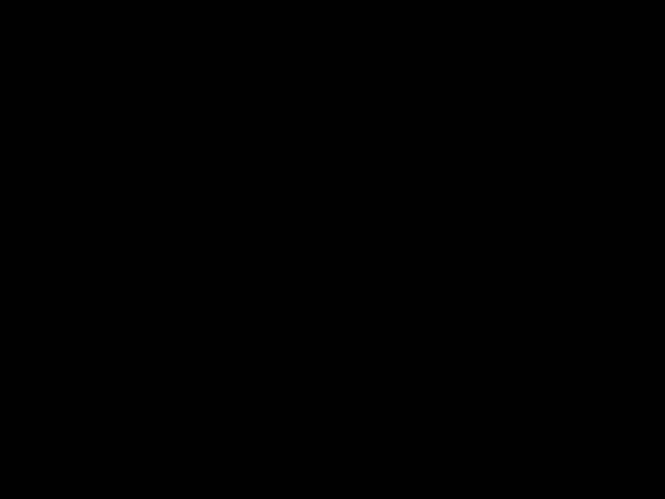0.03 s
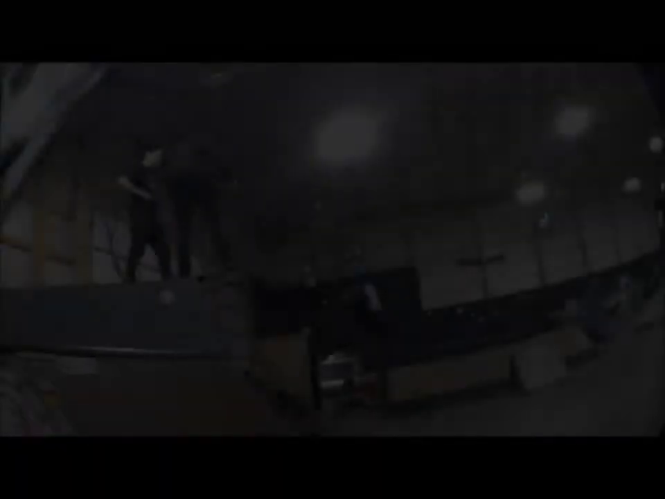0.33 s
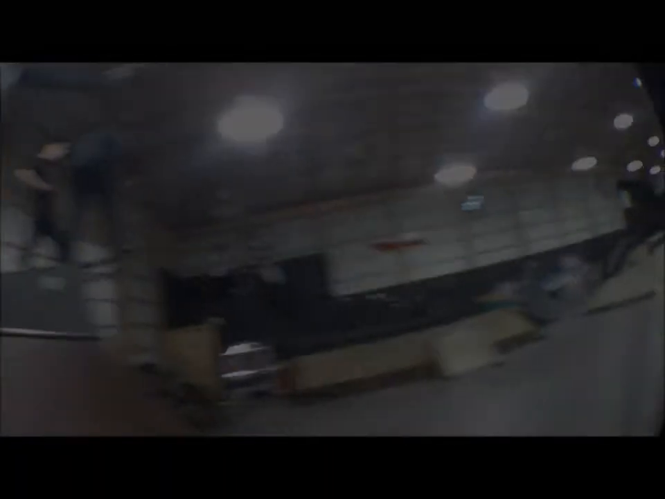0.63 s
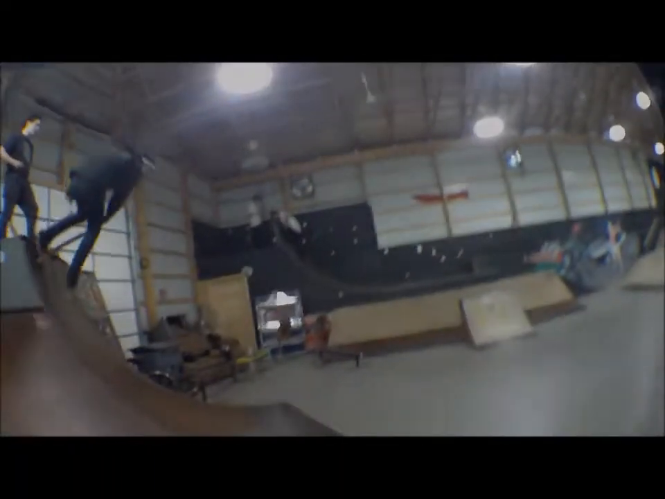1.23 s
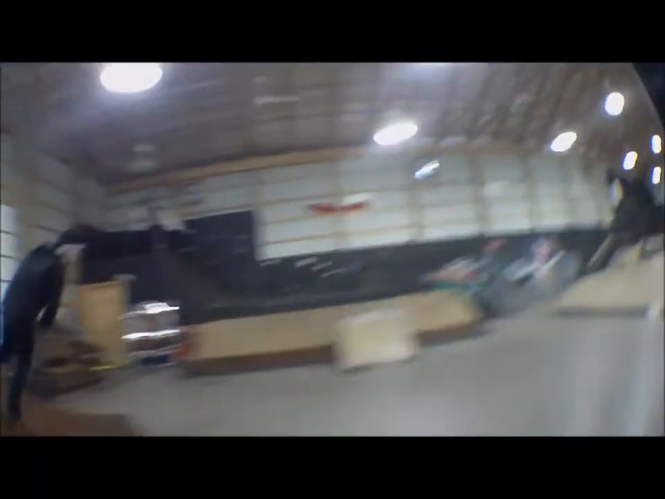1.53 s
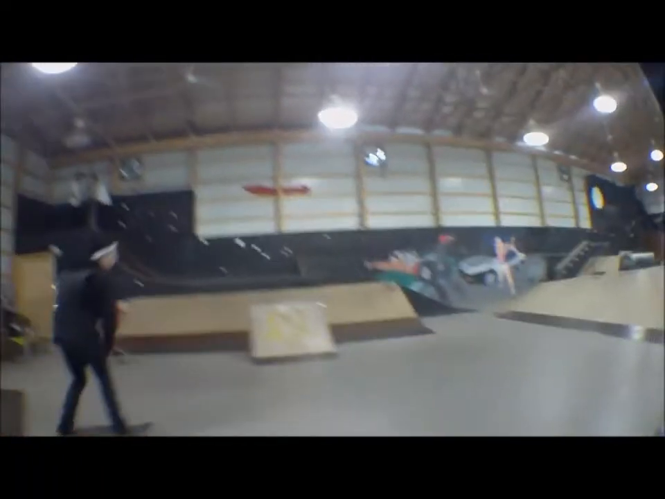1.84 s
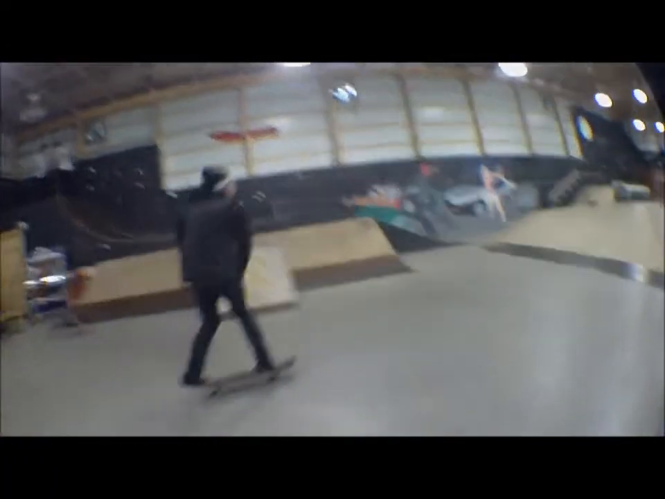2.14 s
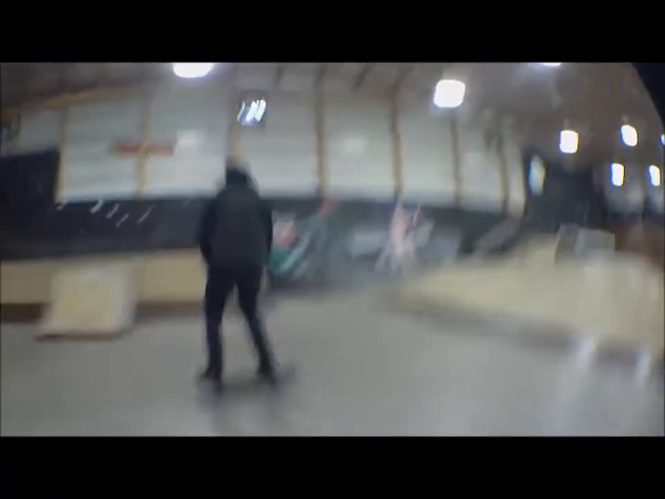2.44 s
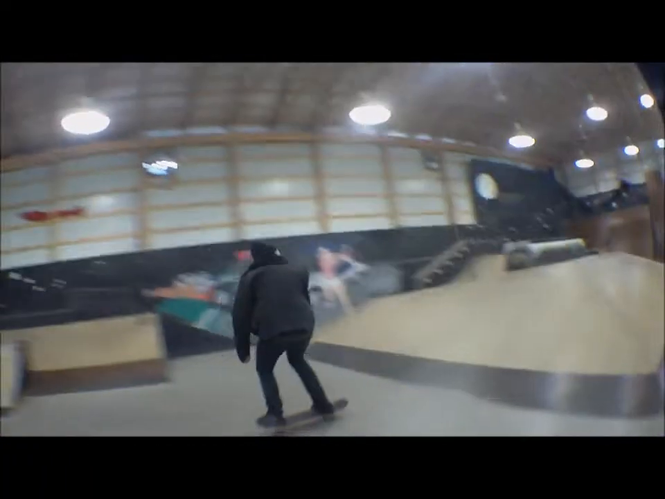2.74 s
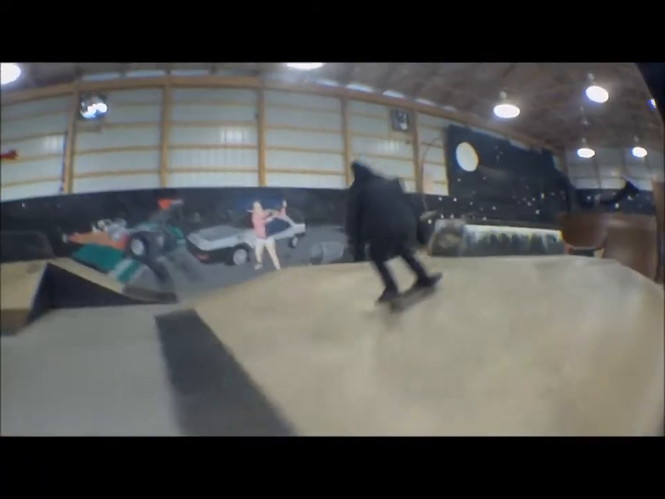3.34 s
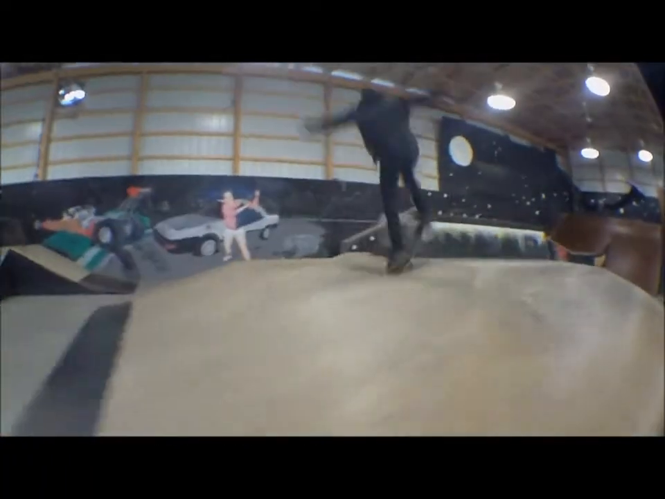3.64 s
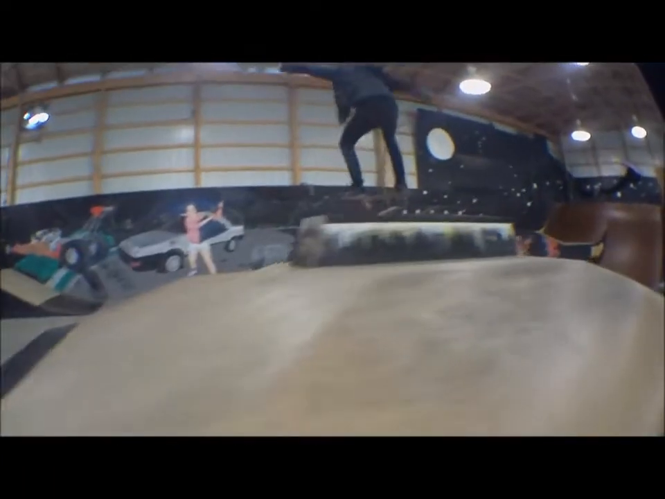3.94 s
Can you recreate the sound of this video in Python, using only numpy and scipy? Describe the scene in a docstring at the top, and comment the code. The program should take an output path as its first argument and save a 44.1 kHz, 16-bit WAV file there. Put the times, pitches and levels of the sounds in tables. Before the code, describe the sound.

A skateboard drops down a hollow wooden ramp, rolls across concrete with ringing wheels, then rumbles up a wooden bank with sharp clacks. The big hall echoes, and air buffets the microphone following close behind.

```python
"""Skateboarding in a big hall

A skateboarder drops in on a plywood quarter pipe, crosses a concrete floor and rides up a wooden bank.
The wheels rumble in the hollow ramps, sing on the concrete and clack over seams, and the hall echoes.
Other boards roll far away. A mono camera follows close by: it pops as it starts, air buffets its
microphone and its limiter turns down the loudest clacks."""
import sys
import numpy as np
from scipy import signal
from scipy.fft import rfft, irfft
from scipy.io import wavfile
from scipy.ndimage import uniform_filter1d, minimum_filter1d

SR = 44100
rng = np.random.default_rng(int(sys.argv[2]) if len(sys.argv) > 2 else 0)


def persist_wave(psi):
    """Save psi, clipped to +-1, as 16-bit WAV."""
    counts = np.round(np.clip(psi, -1, 1) * 32767).astype(np.int16)
    wavfile.write(sys.argv[1], SR, np.atleast_2d(counts).T)


N = 176400
T = np.arange(N) / SR
HZ = np.fft.rfftfreq(N, 1 / SR)
CAMERA_START_S = 0.1059

# The tone of each sound, from bass to treble. Each row: frequency in Hz, relative level in dB.
FAR_ROLL_TONE = [(30, -2), (60, -8.5), (110, -4), (160, 2), (210, -1), (280, -1.5), (480, 3.5), (650, -1.5),
                 (1000, -8.5), (2000, -20.5), (3800, -29), (5000, -45), (12000, -61)]
WIND_TONE = [(15, -4), (35, -5), (70, -2), (140, -3.5), (250, -8.5), (500, -15.5), (1500, -53), (8000, -85)]
BEARING_TONE = [(2000, -25), (5000, 1), (10000, -0.5), (12000, -5), (14000, -35), (15000, -45)]
LANDING_TONE = [(40, -14), (100, -7), (160, 2.5), (280, -7), (400, 4.5), (560, -11.5), (760, -5),
                (950, -21), (1500, -17.5), (2500, -33.5), (3800, -37.5), (5000, -54), (12000, -63)]
TICK_TONE = [(500, -25), (3000, -1), (4500, -2), (7200, -1), (10000, -5), (14000, -21)]
CRACK_TONE = [(200, -20), (700, 8.5), (1400, 1.5), (2500, 2), (4000, -1), (6800, -2.5), (8500, -6),
              (10500, -9.5), (13000, -20), (15500, -37)]
THUMP_TONE = [(40, -9), (100, -3.5), (170, -1), (280, -0.5), (420, -2), (560, 0.5), (760, -2), (950, -16),
              (1500, -9.5), (2500, -30), (3800, -41), (5000, -52), (12000, -60)]
QUARTER_PIPE_TONE = [(24, -48), (40, -27), (79, -16), (202, 5), (363, -4.5), (551, -2.5), (704, -7),
                     (776, -22), (856, -11), (2170, -39), (4010, -35), (4760, -48), (11200, -54.5),
                     (12700, -72), (14000, -84)]
FLOOR_TONE = [(24, -52.5), (40, -17), (54, -37), (202, -7.5), (372, -8.5), (499, -7), (670, -9), (758, -4),
              (922, -13.5), (1210, -13.5), (2070, -34), (2520, -34), (4650, -41.5), (10400, -46),
              (14000, -65)]
BANK_TONE = [(24, -51), (40, -41), (112, -12.5), (154, -3.5), (306, -7.5), (551, -8), (1400, -20),
             (1970, -30), (2710, -32), (3730, -29.5), (4530, -37), (6550, -37), (11000, -52), (12700, -65),
             (14000, -101)]
# How the long sounds swell and fade. Each row: time in seconds, level in dB.
FAR_ROLL_LEVELS = [(.1, -46), (.13, -47), (.22, -47.5), (.31, -38), (.42, -44), (.51, -45), (.6, -29),
                   (.76, -30), (.93, -33), (1.15, -29.5), (1.28, -22.5), (1.5, -16), (4, -34)]
WIND_LEVELS = [(.12, -57), (.5, -50), (1.25, -35.5), (1.35, -35), (1.5, -47), (1.66, -36), (2.02, -23.5),
               (2.15, -54), (2.325, -43), (2.338, -12), (2.37, -17.5), (2.46, -15), (2.51, -17),
               (2.62, -21), (2.73, -17.5), (2.85, -19), (2.95, -23.5), (3.4, -55), (3.65, -18), (4, -25)]
BEARING_LEVELS = [(.1, -88), (.2, -72), (.25, -64), (.3, -72), (.5, -74), (.55, -63.5), (.95, -63),
                  (1.15, -59.5), (1.27, -54), (1.45, -45.5), (2.0, -52), (2.17, -53), (2.4, -48),
                  (2.65, -56), (4, -69.5)]
# Wheel skids, bearing whistles and a rustle.
# Each row: start and length in seconds, level in dB, pitch and band width in Hz.
SHORT_HISSES = [(.215, 0.068, -51, 1504, 900), (1.622, .03, -32, 4000, 600), (1.665, 0.12, -36, 4100, 1100),
                (2.17, .16, -30.5, 1100, 600), (2.205, .15, -48, 5700, 1800),
                (2.68, 0.16, -46.5, 5600, 1000), (2.898, 0.11, -24.5, 4740, 1300),
                (3.023, 0.083, -20, 5000, 1710), (3.432, 0.15, -22, 1492, 1820),
                (3.523, 0.065, -20.5, 6660, 924), (3.528, 0.06, -22, 9800, 3600),
                (3.758, 0.163, -31.5, 3880, 1100)]
# A board landing far away. Each row: start in seconds, level in dB, decay time in seconds.
LANDING_THUDS = [(.523, -17.5, 0.024), (0.542, -16, 0.024)]
# Ticks near the camera. Each row: start in seconds, level in dB.
TICKS = [(0.618, -35), (0.646, -27.5), (3.214, -24), (3.314, -19)]
# Hollow ramp panels. Each row: start and length in seconds, pitch and band width in Hz, level in dB.
RAMP_BOOMS = [(1.076, 0.15, 160, 34.6, -31.5), (1.318, 0.18, 125, 50, -21.5), (1.48, 0.43, 250, 139, -17.5),
              (2.942, 0.25, 310, 120, -19.5), (3.065, 0.11, 129.3, 46, -8), (3.163, .25, 162.9, 55, -11),
              (3.446, 0.36, 155, 35.4, -20.5)]
# Wheels and trucks (the metal axles) hitting seams and edges. Each row: start in seconds,
# crack and thump levels in dB, ring pitch in Hz, ring level in dB, decay time in seconds.
CLACKS = [(1.273, -31, -28, 2600, -24, 0.0015), (1.295, -26, -26, 3280, -30, .002),
          (1.3001, -19.5, -4.5, 2320, -18, 0.0033), (1.33, -31, -14.5, 2510, -28, 0.0043),
          (1.675, -27, -9, 4100, -19, 0.0058), (1.7005, -21, -8.5, 5140, -30, 0.0063),
          (1.762, -21, -17, 840, -19, 0.0055), (2.159, -27, -27, 1700, -24, 0.0052),
          (2.306, -22, -25, 2600, -19.5, 0.0056), (2.864, -36, -34, 2810, -25, 0.0033),
          (2.8966, -15, -25, 4610, -9.5, 0.0051), (2.921, -38, -9.5, 1300, -13.5, .006),
          (2.9655, -16.5, -8, 4970, -15, .011), (3.049, -19.5, -8, 646, -15, 0.032),
          (3.415, -12, -11, 10500, -22, 0.011), (3.4218, -1.5, -18, 4600, -19, 0.0092),
          (3.461, -12, -8.5, 3650, -23, 0.023), (3.528, -7.5, -27, 1394, -14, 0.029),
          (3.555, -17, -12, 6540, -18, .015), (3.632, -32, -10, 3885, -17.5, 0.012),
          (3.865, -19, -12.5, 4000, -24, 0.0087), (3.989, -14, -6, 3900, -24, 0.0094)]
# Rolling on each surface. Each row: time in seconds, rumble and grit levels in dB before roll's gains.
QUARTER_PIPE_LEVELS = [(1.3, -13.5, -22.5), (1.318, -17, -36), (1.428, -20, -38), (1.44, -14.5, -41),
                       (1.662, -9, -28.5), (1.672, -10.5, -24.5), (1.88, -14.5, -31)]
FLOOR_LEVELS = [(1.88, -26, -47), (1.928, -24.5, -40.5), (2.272, -17, -30.5), (2.316, -13.5, -31),
                (2.326, -15.5, -35.5), (2.718, -20, -37), (2.894, -16.5, -33), (2.9, -14.5, -23)]
BANK_LEVELS = [(2.9, -23, -27), (3.0, -7, -20), (3.11, -10, -26), (3.2, -10.5, -29.5), (3.4, -11, -38),
               (3.48, -6.5, -19), (3.65, -9.5, -23.5), (3.8, -10, -26.5), (4.0, -8.5, -24)]
# Dry knocks close to the microphone. Each row: time in seconds, peak level in dB, pitch in Hz.
KNOCKS = [(1.4415, -13, 496), (1.4943, -9, 600), (1.761, 0, 850), (1.986, -8, 653), (2.342, -4, 350),
          (2.5392, -9, 750), (2.5845, -11, 700), (2.74, -13, 900), (2.768, -7, 1070), (2.8442, -4, 1080),
          (2.882, -2.5, 1150), (2.919, -2, 1190)]
# Wheels singing on concrete. Each row: time in seconds, pitch in Hz, level in dB.
WHEEL_RING = [(1.7, 808.5, -48), (1.76, 789, -16.5), (1.84, 784, -22), (2.0, 765.7, -19.5),
              (2.3, 760.3, -20.5), (2.54, 724, -22.5), (2.62, 736, -42), (2.9, 773, -38), (3.0, 756, -51)]
# How long the hall echoes. Each row: frequency in Hz, seconds to fade by 60 dB.
HALL_DECAY = [(100, 2.3), (500, 1.5), (2000, 1.09), (5000, 0.91), (9000, 0.67), (15000, 0.64)]


def amp(db):
    """Turns decibels into a number to multiply by."""
    return 10 ** (np.asarray(db) / 20)


def unit(x):
    """Scales a sound to an average (rms) level of 1."""
    return x / np.sqrt(np.mean(x ** 2) + 1e-20)


def curve(rows, column=1):
    """Follows one column of a table smoothly through time."""
    rows = np.array(rows)
    return np.interp(T, rows[:, 0], rows[:, column])


def look_up(rows, hz):
    """Reads a table at any frequency, joining its rows on a log scale."""
    row_hz, values = np.transpose(rows)
    return np.interp(np.log(hz + 1), np.log(row_hz + 1), values)


def add(mix, start, sound):
    """Mixes a sound in at a start time in seconds."""
    part = mix[max(round(start * SR), 0):][:len(sound)]
    part += sound[:len(part)]


def noise():
    """An even hiss (white noise)."""
    return rng.standard_normal(N)


def filtered(x, gains):
    """Gives each frequency its own gain, then sets the level to 1."""
    return unit(irfft(rfft(x) * gains, N))


def colour(x, tone):
    """Shapes a sound with a tone table."""
    return filtered(x, amp(look_up(tone, HZ)))


def resonance(hz, width_hz):
    """Something shaken at random rings around one pitch; a wider band sounds more like hiss."""
    offset_hz = np.fft.fftfreq(N, 1 / SR)
    shake = np.fft.ifft((noise() + 1j * noise()) / (1 + abs(2 * offset_hz / width_hz) ** 3))
    phase = 2 * np.pi * np.cumsum(hz * np.ones(N)) / SR
    return unit((shake * np.exp(1j * phase)).real)


def blow(start, decay, rise_s=0.00076):
    """The loudness of a hit: it jumps up, then dies away."""
    age = np.maximum(T - start, 0)
    return np.minimum(age / rise_s, 1) * np.exp(-age / decay)


def hall(x):
    """Many reflections blur into one echo, whose treble dies first."""
    reflections = rng.standard_normal(SR) * np.minimum(T[:SR] / 0.017, 1)
    hz, t, bands = signal.stft(reflections, SR, nperseg=256)
    fade = 1000. ** (-t / look_up(HALL_DECAY, hz)[:, None])
    tail = signal.istft(bands * fade, SR, nperseg=256)[1]
    return signal.fftconvolve(x, tail / np.linalg.norm(tail))[:N]


def rough_noise(bumps_per_s=300, bump_share=0.24, throb_hz=54.16):
    """Fine roughness and separate bumps, throbbing like the force under turning wheels."""
    bump_sizes = amp(3 * np.minimum(rng.exponential(1, N), 3))
    bumps = (rng.random(N) < bumps_per_s / SR) * bump_sizes * np.sign(noise())
    flutter = filtered(noise(), (HZ > 8) / (1 + (HZ / 40) ** 2))  # wobbles the level and the throb
    throb = 1 + 0.1 * np.sin(2 * np.pi * np.cumsum(throb_hz * (1 + 0.3 * flutter)) / SR)
    force = np.sqrt(1 - bump_share) * noise() + np.sqrt(bump_share) * unit(bumps)
    return force * amp(flutter) * throb


def camera_pop(hz=426, length_s=0.0013):
    """One electric pop as the camera starts."""
    out = np.zeros(N)
    t = np.arange(0, length_s, 1 / SR)
    add(out, CAMERA_START_S, amp(-6.5) * np.cos(2 * np.pi * hz * t))
    return out


def far_boards():
    """Boards roll elsewhere in the hall with a dull rumble."""
    return colour(rough_noise(), FAR_ROLL_TONE) * amp(curve(FAR_ROLL_LEVELS))


def hum(hz=109.6):
    """A faint, steady low note."""
    return amp(-50) * unit(np.sin(2 * np.pi * hz * T))


def wind():
    """Air buffets the moving microphone in deep gusts."""
    return colour(rough_noise(), WIND_TONE) * amp(curve(WIND_LEVELS))


def bearings():
    """The spinning wheel bearings make a thin hiss."""
    return colour(rough_noise(), BEARING_TONE) * amp(curve(BEARING_LEVELS))


def short_hisses(fade_s=0.01):
    """Wheel skids, thin bearing whistles and a faint rustle, each a brief band of hiss."""
    out = np.zeros(N)
    for start, length, db, hz, width in SHORT_HISSES:
        fade = np.clip(np.minimum(T - start, start + length - T) / fade_s + 0.5, 0, 1)
        out += resonance(hz, width) * amp(db) * fade
    return out + amp(-14) * hall(out)


def far_landing():
    """A distant board lands with two quick thuds that echo."""
    loudness = sum(amp(db) * blow(start, decay) for start, db, decay in LANDING_THUDS)
    thuds = colour(noise(), LANDING_TONE) * loudness
    return thuds + amp(-6) * hall(thuds)


def ticks():
    """Small, dry ticks close to the camera."""
    return colour(noise(), TICK_TONE) * sum(amp(db) * blow(start, decay=0.0015) for start, db in TICKS)


def ramp_booms():
    """Each hollow panel booms at its own pitch while the board is on it."""
    out = np.zeros(N)
    for start, length, hz, width, db in RAMP_BOOMS:
        progress = np.clip((T - start) / length, 0, 1)
        out += resonance(hz, width) * amp(db) * np.sqrt(abs(np.sin(np.pi * progress)))
    return out


def clacks(ring_width_hz=1100):
    """Each hit is a sharp crack, a wooden thump and a brief ring of the truck, echoed by the hall."""
    crack, thump = colour(noise(), CRACK_TONE), colour(noise(), THUMP_TONE)
    rattle = filtered(noise(), 1 / (1 + (2 * HZ / ring_width_hz) ** 2))
    body, ring = np.zeros((2, N))
    for start, crack_db, thump_db, ring_hz, ring_db, decay in CLACKS:
        force = blow(start, decay)
        body += force * (amp(crack_db) * crack + amp(thump_db) * thump)
        ring += force * amp(ring_db) * unit(rattle * np.sin(2 * np.pi * ring_hz * T))
    return body + ring + hall(amp(-1.5) * body + amp(-10) * ring)


def roll(levels, tone, rumble_gain_db, grit_gain_db, split_hz=1325, fade_s=0.032):
    """Wheels shake one surface, making a low rumble with a gritty hiss above it."""
    shaking = colour(rough_noise(), tone)
    lows = 1 / (1 + (HZ / split_hz) ** 6)
    rumble = filtered(shaking, lows) * amp(curve(levels) + rumble_gain_db)
    grit = filtered(shaking, 1 - lows) * amp(curve(levels, column=2) + grit_gain_db)
    arrive, leave = levels[0][0], levels[-1][0]
    fade = np.clip(np.minimum(T - arrive, leave - T + fade_s) / fade_s + 0.5, 0, 1)
    return np.sqrt(fade) * (rumble + grit)


def knocks(decay_cycles=0.77):
    """The camera's housing or its operator's board knocks: one swing that dies almost at once."""
    out = np.zeros(N)
    t = np.arange(-200, 200) / SR  # centred on the peak
    for time, db, hz in KNOCKS:
        swing = -np.cos(2 * np.pi * hz * t) * np.exp(-abs(hz * t) / decay_cycles)
        add(out, time + t[0], amp(db) * swing)
    return out


def wheel_ring():
    """The hard wheels sing on the concrete, dipping a little in pitch as they slow."""
    loudness = amp(curve(WHEEL_RING, column=2)) * (T > WHEEL_RING[0][0])
    return resonance(curve(WHEEL_RING), width_hz=77) * loudness


def scene():
    """The whole ride, the same in both ears."""
    mono = camera_pop() + (far_boards() + hum() + wind()) * (T > CAMERA_START_S)
    mono += bearings() + short_hisses() + far_landing() + ticks() + ramp_booms() + clacks()
    mono += roll(QUARTER_PIPE_LEVELS, QUARTER_PIPE_TONE, rumble_gain_db=-2, grit_gain_db=-4)
    mono += roll(FLOOR_LEVELS, FLOOR_TONE, rumble_gain_db=1, grit_gain_db=1)
    mono += roll(BANK_LEVELS, BANK_TONE, rumble_gain_db=-0.5, grit_gain_db=3)
    mono += knocks() + wheel_ring()
    return np.array([mono, mono])


def limit(x, level_db, ceiling_db, recover_db_per_s):
    """Turns the sound down when its level passes the ceiling, then lets it come back."""
    recovery = T * recover_db_per_s
    held_db = np.maximum.accumulate(level_db + recovery) - recovery
    excess_db = np.maximum(held_db - ceiling_db, 0)
    return x / amp(uniform_filter1d(excess_db, size=40))


def record(dry, notch_hz=7850, top_hz=15400):
    """The camera tames loud moments, cuts a narrow treble band, limits peaks and drops the top treble."""
    average_db = 10 * np.log10(abs(uniform_filter1d(dry[0] ** 2, size=300)) + 1e-12)
    x = limit(dry[0], average_db, ceiling_db=-5.5, recover_db_per_s=122)
    notch = signal.butter(3, [notch_hz - 170, notch_hz + 170], "bandstop", fs=SR, output="sos")
    x = signal.sosfilt(notch, x)
    peak_db = 20 * np.log10(1e-6 - minimum_filter1d(-abs(x), size=40))
    x = limit(x, peak_db, ceiling_db=0, recover_db_per_s=1500)
    low_pass = signal.firwin(301, top_hz, window=("kaiser", 8), fs=SR)
    x = signal.oaconvolve(x, low_pass, "same")
    return np.array([x, x])


dry = scene()
out = record(dry)
persist_wave(out)
```